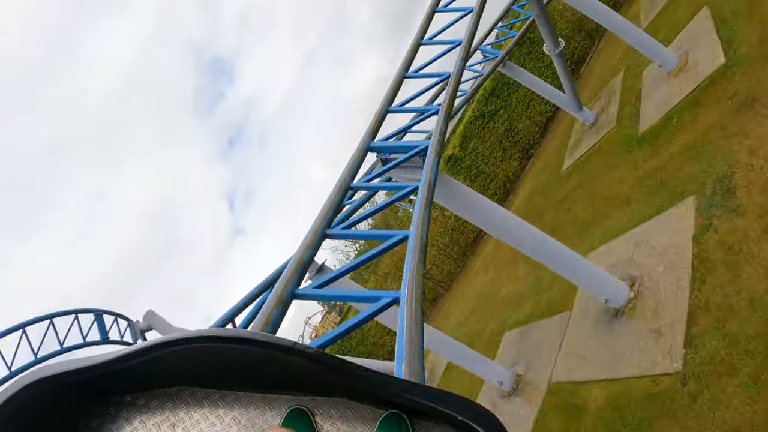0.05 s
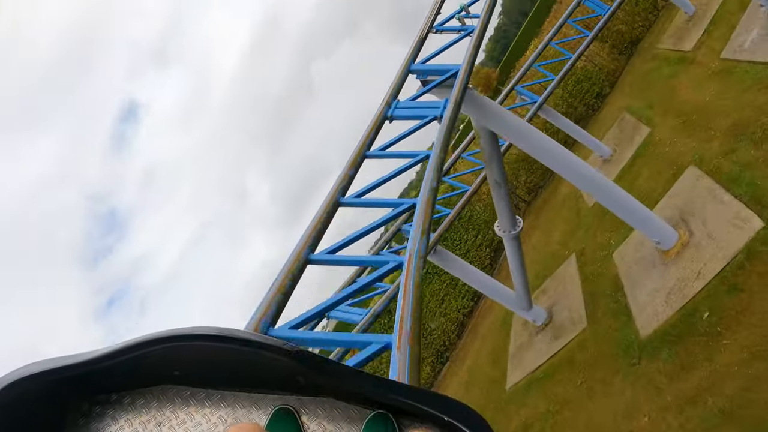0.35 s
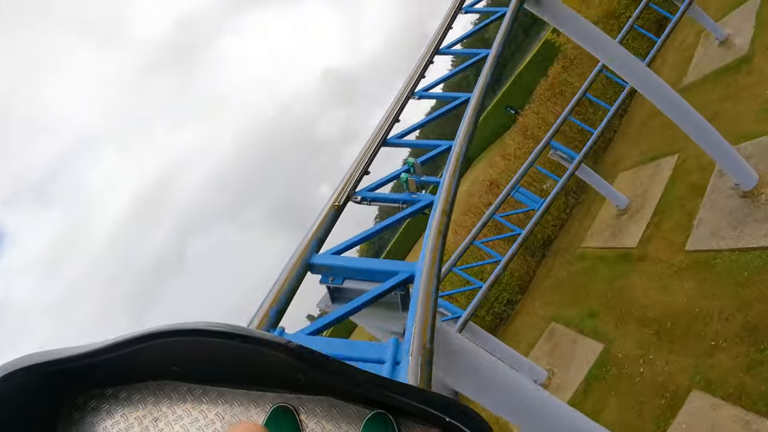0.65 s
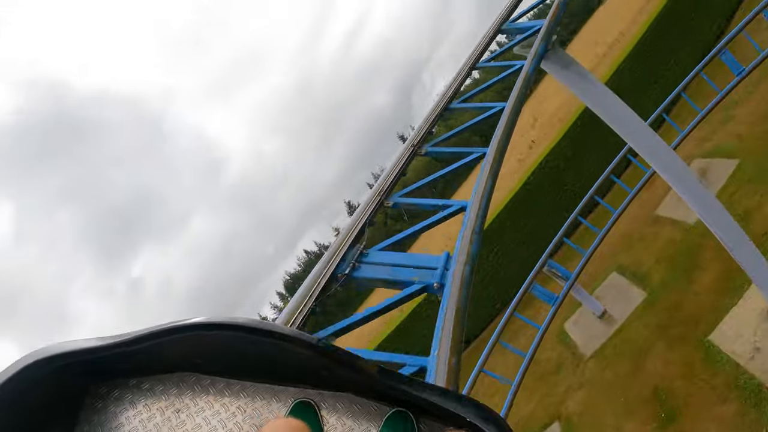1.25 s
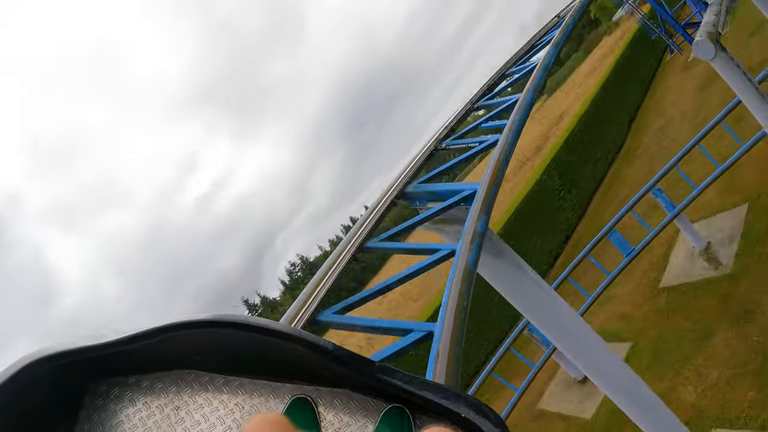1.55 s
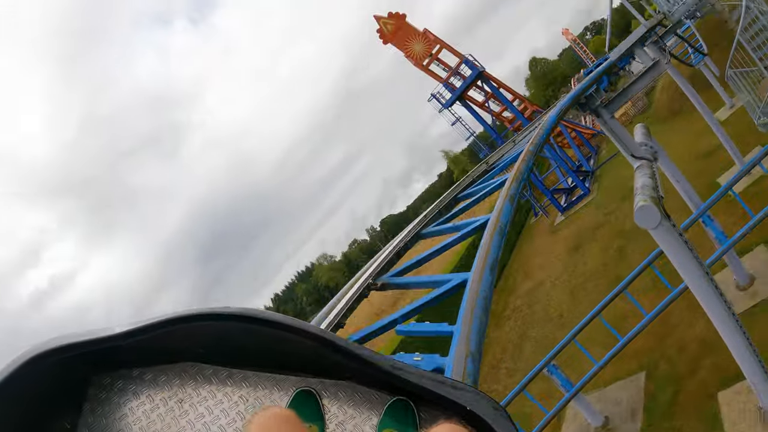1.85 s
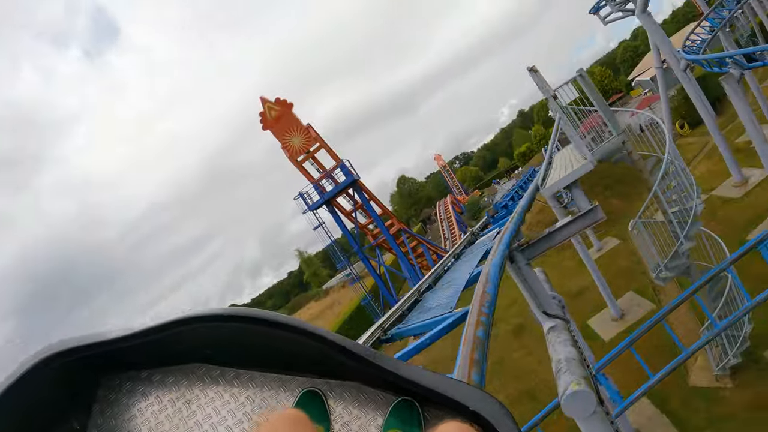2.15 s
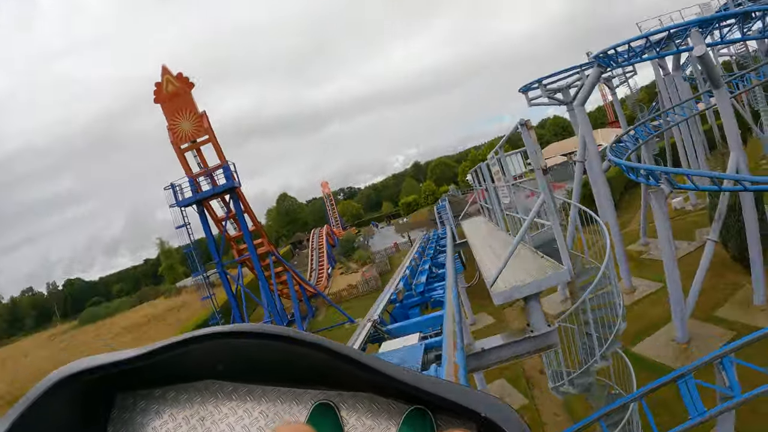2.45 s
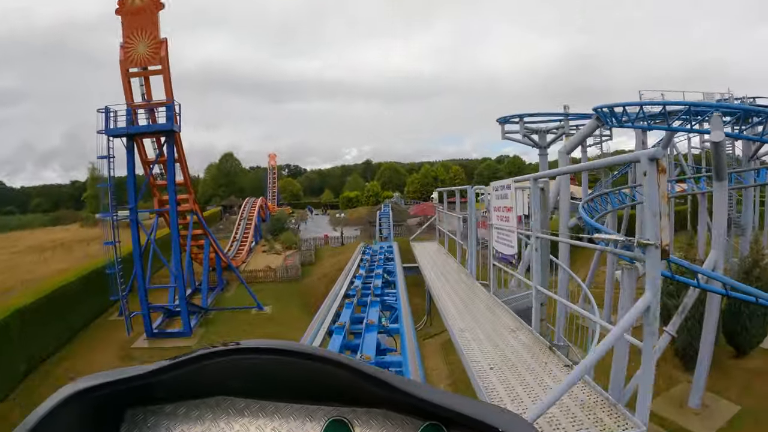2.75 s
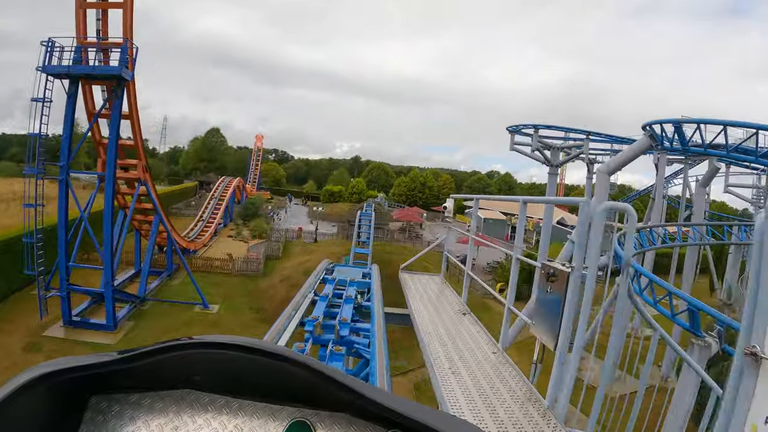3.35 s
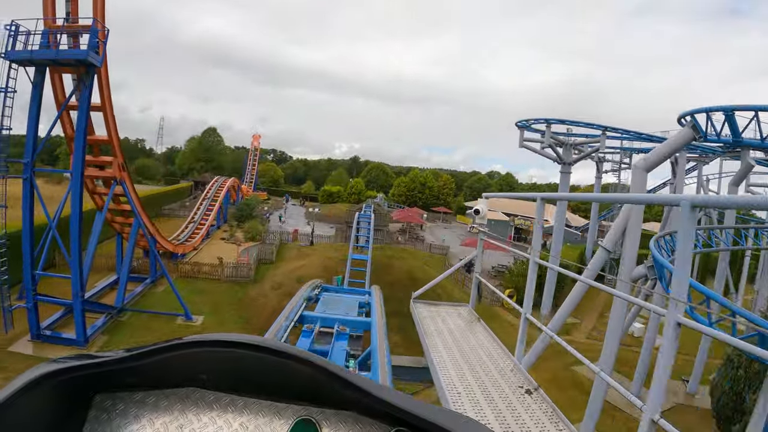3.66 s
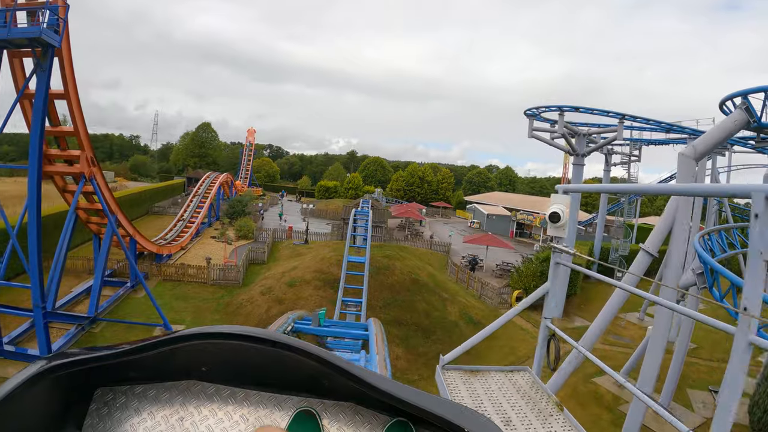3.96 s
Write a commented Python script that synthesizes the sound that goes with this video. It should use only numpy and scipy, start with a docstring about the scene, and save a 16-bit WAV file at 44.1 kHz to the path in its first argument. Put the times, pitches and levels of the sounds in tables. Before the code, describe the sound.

A roller coaster car rumbles over steel rails, heard from a seat, with a throbbing boom, bumping wheels and wind buffeting the microphone. At about 1.2 seconds metal clacks sharply, among fainter clacks. Near 2.4 seconds a wheel squeaks faintly, the throbbing stops and the roar dips. From about 2.7 to 3.3 seconds the panels rattle and knock as the car meets the brakes, then it rolls on more quietly.

```python
"""A roller coaster car swings out of a banked curve onto a level stretch, heard from a seat.
From the start the car body booms and throbs, the wheels roar and bump over steel rails, and wind
buffets the microphone. At about 1.2 seconds metal clacks sharply on metal, among fainter clacks.
Near 2.4 seconds a wheel squeaks, and the throbbing stops as the curve ends.
Last, small knocks rattle the car's panels as it runs into the brakes."""
import sys
import numpy as np
from scipy import signal
from scipy.fft import rfft, irfft
from scipy.io import wavfile
from scipy.ndimage import uniform_filter1d, minimum_filter1d

SR = 44100
rng = np.random.default_rng(int(sys.argv[2]) if len(sys.argv) > 2 else 0)


def bounce(signal):
    """Save signal as a 16-bit WAV file at the path given by the first command-line argument."""
    frames = np.transpose(np.atleast_2d(signal))
    limited = np.clip(frames, -1, 1)
    pcm = np.round(limited * 32767).astype(np.int16)
    wavfile.write(sys.argv[1], SR, pcm)


N = 176400  # 4 seconds

# The notes at which the steel wheel parts ring. Each row: pitch in Hz, width in Hz, level in dB.
STEEL_NOTES = [(2745, 40, -9), (3270, 50, -3), (3470, 42, 3), (3576, 45, -3), (3975, 50, -8),
               (4433, 35, -4), (4665, 45, -7), (4978, 35, -6), (5475, 35, -7), (6805, 45, -7),
               (7331, 40, -10), (7850, 45, -9)]


def body_boom():
    """The track shakes the car body at its main low note, which throbs while the car is in the curve."""
    # How loud the boom is. Each row: time in seconds, level in dB.
    loudness = [(0, -12), (.22, -11), (.32, -18), (.64, -14.5), (.8, -17.5), (1.3, -17), (1.5, -12),
                (2.0, -12.5), (2.25, -15), (2.5, -21.5), (2.73, -16), (3.0, -13.5), (3.3, -20),
                (3.45, -24.5), (4.0, -22.5)]
    curve_end_s, release_s = 2.5, .1
    boom = steady(noisy_note(hz=125.74, width_hz=36), span_s=0.64)
    swell = abs(signal.hilbert(boom))  # the outline of the wave
    boom = unit(boom / (swell + 0.81) ** 0.47)  # partly smooths the quick swells too
    in_curve = np.clip((curve_end_s - seconds()) / release_s, 0, 1)
    throb = pulsing(per_s=7.49, crest_s=2.25, swing_db=2 * in_curve)
    return level(loudness) * boom * throb


def chassis_rumble():
    """The track shakes the car's base into a broad, low rumble."""
    # How loud the rumble is. Each row: time in seconds, level in dB.
    loudness = [(0, -19), (.33, -15.5), (1.44, -17.5), (1.53, -20.5), (2.33, -23), (2.39, -32.5),
                (2.6, -22), (2.83, -16), (3.0, -24), (3.12, -18.5), (3.45, -29.5), (3.62, -21.5),
                (3.8, -31), (4.0, -26)]
    # Its tone. Each row: frequency in Hz, level in dB.
    tone = [(70, -22), (140, -10.5), (175, 1.5), (205, 2.5), (240, -3), (295, -3), (355, -14.5), (500, -30),
            (1000, -69), (5000, -100)]
    return level(loudness) * steady(colour(noise(), tone), span_s=0.073)


def wheel_roar(flutter):
    """Wheels roll on the rails: smooth noise mixed with tiny hits of grit, wavering with the flutter."""
    # How loud the roar is. Each row: time in seconds, level in dB.
    loudness = [(0, -23.5), (.45, -23), (.8, -25), (1.12, -25), (1.2, -21), (1.33, -21), (1.45, -27),
                (1.62, -26.5), (1.83, -24.5), (2.02, -27), (2.15, -30.5), (2.35, -32.5), (2.5, -39.5),
                (2.64, -30), (2.82, -22), (2.99, -28.5), (3.17, -30.5), (3.42, -36), (3.62, -34), (4, -35)]
    # Its tone. Each row: frequency in Hz, level in dB.
    tone = [(150, 1.5), (300, -0.5), (420, 2), (620, -5.5), (730, -5.5), (1000, -12.5), (1180, -10),
            (1450, -18), (2150, -21.5), (2600, -35), (4500, -38), (8500, -63), (11000, -87.5)]
    grit_per_s, grit_share = 260, 0.27
    hits = rng.random(N) < grit_per_s / SR
    strength = amp(1.5 * np.minimum(rng.exponential(1, N), 3.5))
    grit = unit(hits * strength * np.sign(noise()))
    rolling = np.sqrt(grit_share) * grit + np.sqrt(1 - grit_share) * noise()
    roar = colour(rolling * amp(2 * flutter), tone)
    return level(loudness) * steady(roar, span_s=.09)


def rail_hiss(flutter):
    """Air and rails hiss, and the same hiss makes the steel wheel parts sing."""
    # How loud the hiss and the singing are. Each row: time in seconds, level in dB.
    hiss_loudness = [(0, -38.5), (.15, -48), (.8, -49.5), (1.1, -46.5), (1.3, -41.5), (1.5, -52),
                     (1.9, -51), (2.2, -53.5), (2.55, -55.5), (2.67, -49), (2.88, -46), (3.1, -50),
                     (3.4, -48.5), (4, -46.5)]
    ring_loudness = [(0, -63), (1.3, -61.5), (2.4, -74), (4, -72)]
    # The tone of the hiss. Each row: frequency in Hz, level in dB.
    tone = [(500, -3.5), (1500, 5.5), (2200, 5), (2600, 1), (3500, -3.5), (5000, -6), (6000, -10),
            (8200, -14), (9300, -21), (11000, -32.5), (16000, -63.5)]
    hiss = colour(noise() * amp(1.2 * flutter), tone)
    ring = unit(sum(amp(db) * resonate(hiss, hz, width) for hz, width, db in STEEL_NOTES))
    return level(hiss_loudness) * hiss + level(ring_loudness) * ring


def wheels():
    """Uneven rolling makes the roar and the hiss flutter together, about ten times a second."""
    flutter = colour(noise(), [(3, -11.5), (10, 7), (25, -4.5), (90, -6.5), (200, -36), (1000, -100)])
    return wheel_roar(flutter) + rail_hiss(flutter)


def jolts():
    """Each heavy jolt rocks the whole car on its wheels for a few slow swings."""
    # The jolts. Each row: start in seconds, level in dB, pitch in Hz.
    hits = [(0.076, -5, 70), (0.442, -9, 49), (.74, -14, 76), (0.836, -10, 72), (1.064, -12, 77.7),
            (2.167, -9.5, 80), (2.537, -9, 62.3), (3.09, -27, 71.7), (3.615, -13, 55), (3.664, -11, 35.4)]
    out = np.zeros(N)
    for start, db, hz in hits:
        rocking = np.sin(2 * np.pi * (hz * seconds() + rng.random()))
        out += amp(db) * strike(start, rise_s=0.0029, fade_s=0.043) * rocking
    return out


def bumps():
    """Each bump of the wheels is a short, dull rattle carried by the car's frame."""
    # The bumps. Each row: start in seconds, level in dB, centre frequency in Hz, fade in seconds.
    hits = [(0.125, -27, 1250, 0.03), (0.214, -26.5, 874, 0.021), (0.395, -23, 900, 0.011),
            (0.498, -24, 750, 0.013), (0.904, -30.5, 1040, 0.089), (1.151, -19, 835, 0.01),
            (1.242, -29, 1150, 0.041), (1.29, -18, 646, 0.027), (1.845, -29.5, 1060, 0.02),
            (1.973, -28, 720, 0.0099), (2.221, -25.5, 1190, 0.019), (2.238, -32, 2060, 0.0082),
            (2.536, -27, 377, 0.024), (2.586, -33, 1180, 0.0089), (2.651, -27.5, 1200, 0.034),
            (2.722, -24.5, 810, 0.012), (2.767, -25, 646, 0.025), (3.016, -20.5, 823, 0.022),
            (3.078, -17.5, 483, 0.02), (3.096, -22.5, 856, 0.043), (3.124, -16.5, 380, 0.033),
            (3.213, -35.5, 1720, 0.011), (3.233, -12.5, 193, 0.039), (3.626, -20, 390, 0.014),
            (3.671, -23, 442, 0.018)]
    # How well the frame carries them. Each row: frequency in Hz, level in dB.
    frame = [(100, 11), (600, 4.5), (870, -1.5), (1400, -4.5), (2150, -0.5), (2550, -10), (4500, -1),
             (9000, -9.5)]
    frame_hz, frame_db = np.transpose(frame)
    hz = np.geomspace(30, 16000, 80)
    carried_db = np.interp(np.log(hz), np.log(frame_hz), frame_db)
    out = np.zeros(N)
    for start, db, centre, fade in hits:
        drop_db = 20 * np.hypot(np.log2(hz / centre), 0.24)  # 20 dB an octave from a rounded peak
        burst = steady(colour(noise(), np.c_[hz, carried_db - drop_db]), span_s=0.0031)
        out += amp(db) * strike(start, rise_s=0.0067, fade_s=fade) * burst
    return out


def clacks():
    """Metal hits metal: a bright burst of chatter, and a blow that rings the steel wheel parts."""
    # The clacks. Each row: start in seconds, level in dB, fade in seconds.
    hits = [(.133, -45, 0.061), (.216, -47, 0.02), (0.641, -48.5, 0.02), (1.2405, -22, 0.015),
            (1.301, -46.5, 0.013), (1.413, -53, 0.011), (1.648, -49, 0.022), (1.702, -50, 0.02),
            (2.01, -49.5, 0.018), (2.094, -49, 0.024), (2.236, -50, 0.026), (2.67, -46.5, 0.01)]
    # The tone of the chatter. Each row: frequency in Hz, level in dB.
    tone = [(500, -4.5), (1500, 5), (2600, 3), (3200, 10), (3850, 0.5), (4600, 1.5), (6000, -2), (8200, -6),
            (9500, -18.5), (10600, -22.5), (11200, -30.5), (16000, -39)]
    rise_s = .0065
    bursts, blows = np.zeros(N), np.zeros(N)
    for start, db, fade in hits:
        faint_tail = amp(-30) * strike(start, rise_s, fade_s=.03)
        bursts += amp(db) * (strike(start, rise_s, fade) + faint_tail)
        blows[round(start * SR)] += amp(db)
    t = np.arange(SR // 10) / SR
    ring = np.zeros(len(t))
    for hz, width, db in STEEL_NOTES:
        dying = np.exp(-np.pi * width * t)  # wider notes die sooner
        ring += amp(db) * dying * np.sin(2 * np.pi * (hz * t + rng.random()))
    ring *= amp(1.5) * np.minimum(t / rise_s, 1)
    return bursts * colour(noise(), tone) + signal.oaconvolve(blows, ring)[:N]


def panel_rattle():
    """Many small knocks ring the car's panels as it runs into the brakes."""
    # How loud the rattle is. Each row: time in seconds, level in dB.
    loudness = [(2.55, -69), (2.66, -36.5), (2.8, -26.5), (2.87, -32), (2.98, -44), (3.25, -39.5),
                (3.45, -75)]
    # The notes of the panels. Each row: pitch in Hz, width in Hz, level in dB.
    notes = [(410, 20, -4), (576, 38, 3), (685, 27, 2.5), (830, 24, 0.5), (1140, 49, -2.5),
             (1380, 76, -9.5), (1708, 70, -3.5), (2560, 60, -10)]
    # The overall tone. Each row: frequency in Hz, level in dB.
    tone = [(150, -15), (400, 1.5), (2600, -4), (5000, -8), (8500, -16), (11000, -42)]
    knocks_per_s = 320
    knocks = (rng.random(N) < knocks_per_s / SR) * rng.uniform(0.56, 1, N)
    panels = sum(amp(db) * unit(resonate(knocks * noise(), hz, width)) for hz, width, db in notes)
    return level(loudness) * steady(colour(panels, tone), span_s=0.05)


def wheel_whine():
    """A wheel gives a thin, pulsing whine."""
    # How loud the whine is. Each row: time in seconds, level in dB.
    loudness = [(0, -50.5), (1.1, -47.5), (1.6, -54), (2.5, -63), (2.75, -54), (3.5, -58), (3.65, -49),
                (4, -48)]
    whine = steady(noisy_note(hz=2070, width_hz=62), span_s=0.064)
    return level(loudness) * whine * pulsing(per_s=9.27, crest_s=3.63, swing_db=4.5)


def wheel_squeak():
    """A wheel squeaks once, its pitch and loudness arching up and back down."""
    # The squeak's two notes. Each row: pitch in Hz and level in dB, both at the top of the arch.
    notes = [(4050, -56), (2480, -52.5)]
    start_s, length_s, pitch_sag, pitch_jitter = 2.405, .075, .11, .17
    arch = np.sin(np.pi * np.clip((seconds() - start_s) / length_s, 0, 1))
    pitch_ratio = 1 - pitch_sag * (1 - arch) + pitch_jitter * noise()
    bent_time = np.cumsum(pitch_ratio) / SR
    return arch * sum(amp(db) * np.sin(2 * np.pi * hz * bent_time) for hz, db in notes)


def wind():
    """Swirling air buffets the microphone with a low, lumpy noise."""
    # How loud the wind is. Each row: time in seconds, level in dB.
    loudness = [(0, -26), (.3, -25), (.85, -15), (1.6, -22.5), (2.3, -22), (3.05, -18), (3.45, -20),
                (4, -21.5)]
    # Its tone. Each row: frequency in Hz, level in dB.
    tone = [(10, -14), (25, -3), (45, 0.5), (60, -0.5), (78, 3), (100, -4.5), (160, -7.5), (400, -32.5),
            (4000, -100)]
    return level(loudness) * steady(colour(noise(), tone), span_s=0.052)


def seconds():
    """The time of every sample."""
    return np.arange(N) / SR


def amp(db):
    """Turns decibels into a number to multiply by."""
    return 10 ** (np.asarray(db) / 20)


def unit(x):
    """Scales a sound to an average power of 1."""
    return x / np.sqrt(np.mean(x ** 2) + 1e-20)


def level(points):
    """A volume curve through points of time in seconds and level in dB."""
    return amp(np.interp(seconds(), *np.transpose(points)))


def noise():
    """White noise."""
    return rng.standard_normal(N)


def colour(x, points):
    """Shapes the tone through points of frequency in Hz and level in dB, then scales to power 1."""
    hz, db = np.transpose(points)
    log_hz = np.log(np.fft.rfftfreq(N, 1 / SR) + 1)
    gain = amp(np.interp(log_hz, np.log(hz), db))
    return unit(irfft(rfft(x) * gain, N))


def resonate(x, hz, width_hz):
    """Lets a sound ring at one pitch; a narrower width rings longer."""
    decay = np.exp(-np.pi * width_hz / SR)
    return 2 * signal.lfilter([1 - decay], [1, -decay * np.exp(2j * np.pi * hz / SR)], x).real


def noisy_note(hz, width_hz):
    """Noise narrowed twice around one pitch, giving a wavering note."""
    return resonate(resonate(noise(), hz, width_hz), hz, width_hz)


def steady(x, span_s):
    """Evens out swells slower than span_s."""
    size = max(int(span_s * SR), 2)
    power = uniform_filter1d(uniform_filter1d(x ** 2, size), size)
    return x / np.sqrt(power + 1e-12)


def strike(start, rise_s, fade_s):
    """The volume curve of a blow: it rises quickly, then dies away."""
    t = seconds() - start
    return np.clip(t / rise_s, 0, 1) * np.exp(-np.maximum(t - rise_s, 0) / fade_s)


def pulsing(per_s, crest_s, swing_db):
    """A volume curve that swings up and down regularly, with one peak at crest_s."""
    return amp(swing_db * np.cos(2 * np.pi * per_s * (seconds() - crest_s)))


def scene():
    """Everything heard at the rider's seat, in one channel."""
    ride = wind() + body_boom() + chassis_rumble() + wheels() + wheel_whine()
    events = panel_rattle() + bumps() + jolts() + clacks() + wheel_squeak()
    return (ride + events)[None]


def record(dry):
    """Turns the loudest peaks down, softens both ends and cuts the highest treble."""
    ceiling, hold_s, top_hz = .71, .008, 15700
    size = int(hold_s * SR)
    needed_gain = ceiling / np.maximum(abs(dry[0]), ceiling)
    gain = uniform_filter1d(minimum_filter1d(needed_gain, size), size)  # hold each dip, then smooth it
    gain *= signal.windows.tukey(N, .001)
    treble_cut = signal.firwin(511, top_hz, window=("kaiser", 9), fs=SR)
    return signal.oaconvolve(dry * gain, treble_cut[None], "same")


dry = scene()
out = record(dry)
bounce(out)
```